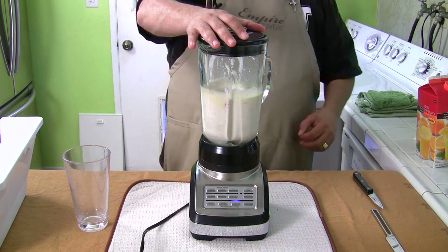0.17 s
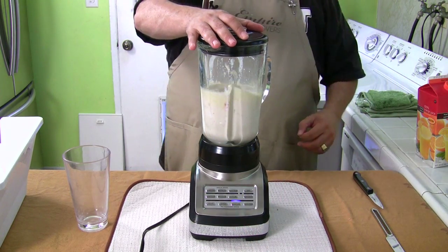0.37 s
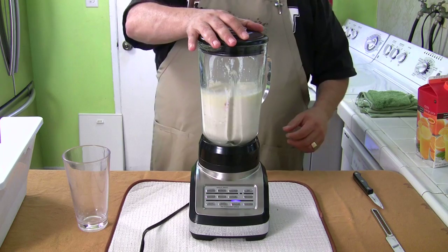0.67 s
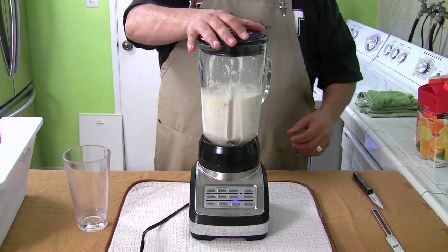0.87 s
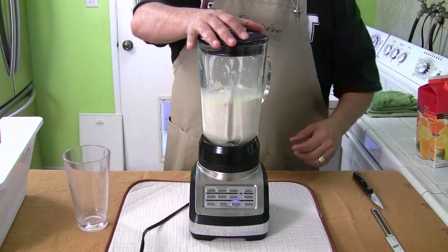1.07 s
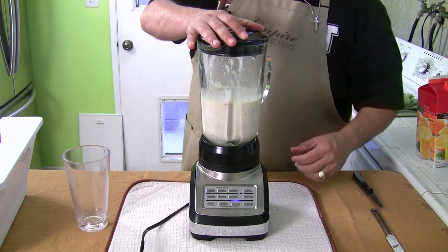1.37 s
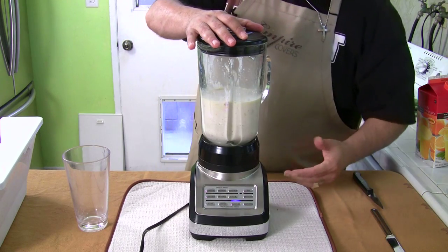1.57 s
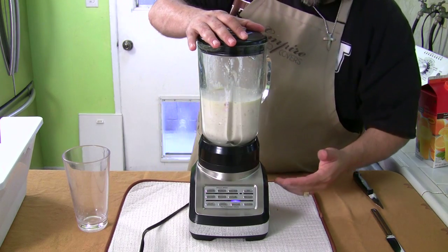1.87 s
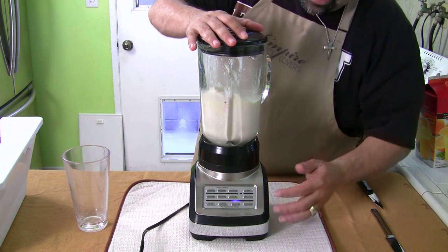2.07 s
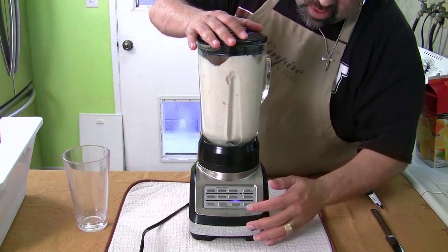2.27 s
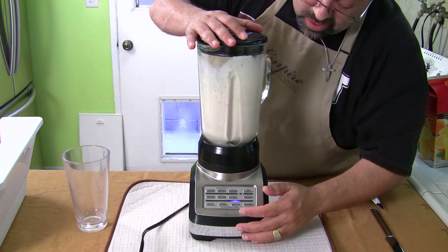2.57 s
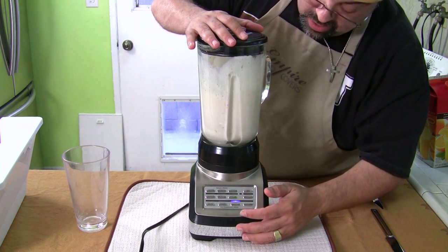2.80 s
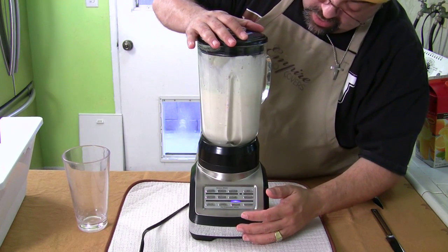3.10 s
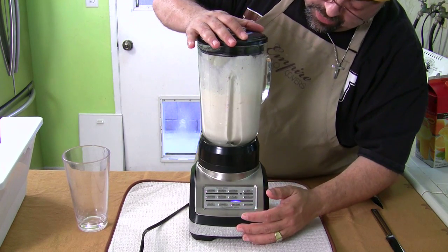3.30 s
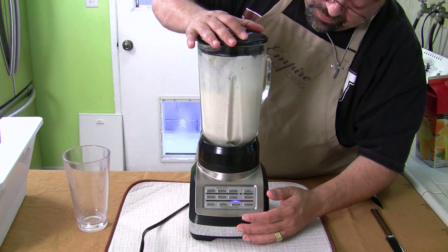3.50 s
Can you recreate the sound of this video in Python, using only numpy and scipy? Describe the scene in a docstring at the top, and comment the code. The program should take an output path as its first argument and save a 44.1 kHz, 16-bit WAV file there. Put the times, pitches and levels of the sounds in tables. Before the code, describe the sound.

A blender crushes ice in a thick drink, loud and rattling, then coasts down through sparser clacks to quiet. After a second it restarts with a tick and gulp, grinding hard again; close microphone, small kitchen.

```python
"""A blender crushes ice into a smoothie in a small kitchen, coasts almost to a stop and starts with a gulp.
Chips snap over a whirr that pulses with each turn; strikes and crunches are short bursts of noise.
Jar and wall ring as banks of resonances; churning and gulp are random clicks turned into liquid tones.
The shaft shakes the base, the windings hum, and a short room tail and quiet ambience lie behind."""
import sys
import numpy as np
from scipy import signal
from scipy.fft import rfft, irfft, next_fast_len
from scipy.io import wavfile

SR = 44100
rng = np.random.default_rng(int(sys.argv[2]) if len(sys.argv) > 2 else 0)


def materialize(psi):
    """Save the field psi as 16-bit PCM at rate SR to the path in sys.argv[1].

    A 1-D psi becomes a single channel; in a 2-D psi each row is a channel.
    """
    bounded = np.clip(np.atleast_2d(psi).T, -1, 1)
    quanta = np.round(bounded * 32767).astype(np.int16)
    wavfile.write(sys.argv[1], SR, quanta)


N = 160965
T = np.arange(N) / SR  # s

# Shaft speed before its small waver. Each row: time in seconds, speed in turns per second.
SHAFT_SPEED = [(0, 218), (.15, 256), (.23, 247), (.29, 215), (.35, 201), (.46, 133), (.51, 121), (.61, 102),
               (1.05, 2), (2.06, 2.01), (2.17, 118), (2.28, 212), (2.44, 240), (2.76, 221), (2.92, 246),
               (3.06, 233), (3.14, 215), (3.29, 249), (3.65, 255)]
SPEED_WAVER = 0.012  # fraction of the speed

# Grinding level. Each row: time in seconds, level in dB.
GRIND_LEVEL = [(0, -20.5), (.44, -23), (.5, -29), (.58, -26), (.68, -27.5), (.73, -33.5), (.81, -24),
               (.86, -40), (.93, -34.5), (1.0, -45), (1.15, -79), (2.058, -91.5), (2.066, -34.5),
               (2.15, -20), (2.24, -26.5), (2.3, -29.5), (2.36, -21), (2.65, -19.5), (3.06, -20),
               (3.14, -22.5), (3.3, -19.5), (3.65, -19.5)]
# Chip and whirr levels are relative to GRIND_LEVEL.
CHIPS_PER_S, CHIP_SPREAD_DB, CHIP_DECAY_S, CHIPS_DB = 890, 3, 0.0038, -3.5
WHIRR_DB, WHIRR_DEPTH = -9.5, 0.35
# Treble gain is TREBLE_DB times 0.5 at top speed, 1.5 at standstill.
DULL_ABOVE_HZ, TREBLE_DB = 8000, -4.5
# Grinding spectrum, liquid low in the jar. Each row: frequency in Hz, relative density in dB per Hz.
LOW_FILL_SPECTRUM = [(300, -13.5), (1050, -7.5), (1380, 0), (1950, -7.5), (4500, -4), (7200, -5),
                     (10500, -18), (12500, -17.5), (15000, -13.5)]
# Grinding spectrum, liquid thrown up the walls. Each row: frequency in Hz, relative density in dB per Hz.
HIGH_FILL_SPECTRUM = [(300, -10.5), (750, 0.5), (1060, -18.5), (1300, 2.5), (1950, 4), (2430, -3),
                      (3400, -2.5), (6200, -1), (8500, -7.5), (10200, -18), (12500, -17), (14300, -10.5),
                      (15800, -13)]

# A blade hits a lump of ice. Each row: start in seconds, level in dB relative to STRIKE_DB.
ICE_STRIKES = [(0.0014, 3.5), (0.2355, -1.5), (0.4075, -2.5), (0.534, -2), (0.6152, -1), (0.6708, -6),
               (0.6923, -1), (0.6984, -5), (0.7563, -2), (0.778, -1.5), (0.796, -16), (0.8057, -1),
               (0.8174, -11), (0.8786, -9), (0.8877, -4), (0.9084, -5), (0.9654, -20.5), (1.005, -29),
               (1.013, -25), (1.116, -42), (2.0716, -5), (2.1387, -2), (2.1607, 2), (2.179, 1.5),
               (2.199, -3), (2.3037, -5), (2.32, 1), (2.383, 0), (2.4461, 5), (2.59, -17), (2.6, 3.5),
               (2.7414, 4.5), (2.8025, -0.5), (2.867, -2), (2.9404, -1), (2.971, -3), (3.055, 0.5),
               (3.1126, 0), (3.2313, -1.5), (3.3155, -3.5), (3.418, -2.5), (3.4706, 1)]
STRIKE_DB, STRIKE_RISE_S, STRIKE_DECAY_S = -10.5, 0.0027, 0.0039
# A lump is caught and chewed up. Each row: middle in seconds, length in seconds, level in dB re CRUNCH_DB.
ICE_CRUNCHES = [(0.317, 0.0076, -13.5), (0.379, 0.031, -15.5), (0.408, 0.013, -9), (0.621, 0.013, -14),
                (2.331, 0.0076, -14.5), (2.125, 0.027, -17), (2.226, 0.02, -15.5), (2.375, 0.038, -16),
                (2.441, 0.015, -11.5), (2.558, 0.025, -14), (2.599, 0.021, -11.5), (2.753, 0.0089, -13.5),
                (3.018, 0.009, -10), (3.379, 0.022, -14)]
CRUNCH_DB, GRIT_DB, GRIT_RATE_HZ = -6.0, 4.5, 450
# Breaking-ice spectrum. Each row: frequency in Hz, relative density in dB per Hz.
CRACK_SPECTRUM = [(80, -19), (300, -3.5), (1300, 0), (2100, -4.5), (2900, 3), (6300, -0.5), (8000, -4.5),
                  (11000, -16.5), (15000, -13)]

# A whole cube clonks against the jar. Each row: start in seconds, level in dB.
CUBE_THUDS = [(.396, -0.5), (.778, -3), (.806, -8), (2.223, -5)]
# Clonk resonances. Each row: frequency in Hz, width in Hz, linear gain.
THUD_MODES = [(295, 30, 1.1), (1255, 90, 2)]
THUD_DECAY_S = 0.018

# Jar resonances, liquid low. Each row: frequency in Hz, width in Hz, linear gain.
JAR_LOW_MODES = [(1270, 86, 1.5), (2133, 130, 0.59), (2590, 130, 1.8), (2910, 34, 0.7), (3450, 130, 0.62),
                 (3906, 260, 1.3), (4930, 200, 0.62), (6060, 220, 1.284), (7480, 100, 0.48)]
# Jar resonances, liquid high. Each row: frequency in Hz, width in Hz, linear gain.
JAR_HIGH_MODES = [(1620, 130, 0.43), (2818, 194, 1.56), (3300, 130, 0.707), (4100, 165, 1),
                  (4790, 390, 0.65), (5610, 110, 0.82), (6100, 220, 0.78), (6790, 440, 1.05)]

# Wall modes. Each row: frequency in Hz, time to decay by 60 dB in seconds, relative level in dB.
WALL_MODES = [(1494, 0.07, -2.5), (1618.6, 0.057, 9), (1662.5, 0.13, 7.5)]
ICE_ON_WALL = 1.8  # gain from breaking ice to the wall
# Level of soft lumps knocking on the wall. Each row: time in seconds, level in dB.
KNOCK_LEVELS = [(0, -22), (.25, -24), (.5, -30.5), (.68, -26), (.85, -37.5), (1.02, -46.5), (1.12, -100),
                (2.06, -100), (2.1, -24.5), (2.28, -37.5), (2.5, -29.5), (3.65, -25.5)]
KNOCKS_PER_S, KNOCK_SPREAD_DB = 220, 0.5

# Churning level. Each row: time in seconds, level in dB.
CHURN_LEVEL = [(0, -37), (.5, -35), (.72, -39), (.8, -30.5), (.86, -38), (.92, -35.5), (1.05, -47),
               (1.18, -70.5), (2.058, -87.5), (2.068, -24), (2.18, -23.5), (2.3, -32), (3.05, -29.5),
               (3.65, -31.5)]
CHURN_CLICKS_PER_S, CHURN_SPREAD_DB = 1500, 3.5
# Churning spectrum. Each row: frequency in Hz, relative density in dB per Hz.
LIQUID_SPECTRUM = [(25, -18.5), (65, -12), (110, -4.5), (175, -10.5), (225, -0.5), (295, 3.5), (385, -5),
                   (470, 5.5), (580, -8), (1000, -8), (2000, -36.5)]
# The blades bite into the still liquid.
START_S, GULP_RISE_S, GULP_HOLD_S, GULP_FALL_S, GULP_DB = 2.061, 0.0026, 0.11, 0.017, -18
GULP_FROM_HZ, GULP_TO_HZ, GULP_SINK_S, GULP_WIDTH_OCT = 386, 140, 0.12, 0.57
GULP_CLICKS_PER_S, GULP_SPREAD_DB = 1000, 6.0  # clicks per second in each pitch band
HIGH_FILL_FROM_S = START_S - 0.1  # the jar and grinding spectra switch while nearly silent

# The coupling snaps tight at the restart. Each row: frequency in Hz, width in Hz, linear gain.
COUPLING_MODES = [(8750, 670, 0.19), (11450, 660, 1), (13300, 820, 0.64)]
COUPLING_S, COUPLING_DB, COUPLING_DECAY_S = 2.0715, -9, 0.0032

# Shaft imbalance. Each row: multiple of the shaft speed, rms level in dB at top speed.
SHAFT_MULTIPLES = [(1, -40.5), (2, -48.5)]
SHAFT_WAVER_DB = 2
# Resonances of the base on its feet. Each row: frequency in Hz, width in Hz, linear gain.
BASE_MODES = [(114, 12, 15), (290, 8.7, 2), (472, 16, 5.1)]
# Mains hum in the motor. Each row: time in seconds, rms level in dB.
HUM_LEVEL = [(0, -64), (.07, -46), (.14, -35.5), (.21, -53), (.76, -53), (.82, -31), (.88, -45),
             (1.08, -55), (1.2, -76.5), (2.05, -74.5), (2.08, -37), (2.2, -27.5), (2.3, -37), (2.7, -40.5),
             (2.88, -34), (3.65, -37)]
HUM_HZ, HUM_WAVER_DB, HUM_WAVER_RAD = 122.4, 3, 1.0

ROOM_T60_S, ROOM_DB, ROOM_DAMP_HZ, ROOM_DELAY_S = 0.21, -15.5, 7000, 0.004
# Quiet kitchen. Each row: frequency in Hz, relative density in dB per Hz.
AMBIENCE_SPECTRUM = [(28, 0), (58, -8), (85, -18), (172, -11.5), (198, -1.5), (230, -10.5), (1300, -26),
                     (15500, -31)]
AMBIENCE_DB = -63.5
CUTOFF_HZ, PEAK_LIMIT = 15900, 1.3


def from_db(db):
    """Decibels to gain."""
    return 10 ** (np.asarray(db) / 20)


def unit(x):
    """Scale to rms 1."""
    return x / np.sqrt(np.mean(x ** 2) + 1e-20)


def curve(rows):
    """Join (s, value) rows by straight lines."""
    return np.interp(T, *np.transpose(rows))


def noise():
    """White noise."""
    return rng.standard_normal(N)


def drift(rate_hz):
    """Slow random wander of rms 1, with rate_hz new values per second."""
    return unit(np.interp(T * rate_hz, np.arange(2000), rng.standard_normal(2000)))


def decay(age_s, decay_s):
    """Exponential fall that starts at age 0, silent before."""
    return (age_s > 0) * np.exp(-np.clip(age_s / decay_s, 0, 20))


def clicks(per_s, spread_db):
    """Random impacts of uneven size and sign."""
    sizes = from_db(spread_db * np.minimum(rng.exponential(1, N), 4))
    return (rng.random(N) < per_s / SR) * sizes * rng.choice([-1, 1], N)


def colour(x, points):
    """Causal minimum-phase filter with the given spectrum; white noise keeps its level."""
    size = next_fast_len(N + SR // 4) * 2
    hz, db = np.transpose(points)
    bins_hz = np.arange(size // 2 + 1) * SR / size
    gain = unit(from_db(np.interp(np.log(bins_hz + 1), np.log(hz), db)))
    # folding the cepstrum gives minimum phase
    cepstrum = irfft(np.log(gain))
    cepstrum[1:size // 2] *= 2
    cepstrum[size // 2 + 1:] = 0
    return irfft(rfft(x, size) * np.exp(rfft(cepstrum)))[:N]


def resonate(x, hz, width_hz):
    """Two-pole resonance with gain 1 on top."""
    r = np.exp(-np.pi * width_hz / SR)
    zeros = np.array([1, 0, -1]) * (1 - r * r) / 2
    poles = [1, -2 * r * np.cos(2 * np.pi * hz / SR), r * r]
    return signal.lfilter(zeros, poles, x + 1e-18)


def ring(x, modes):
    """Sum of (Hz, width Hz, gain) resonances driven by x."""
    return sum(gain * resonate(x, hz, width_hz) for hz, width_hz, gain in modes)


def grinding(speed, turns):
    """Chips snap in quick succession over a whirr that pulses each turn; colour follows fill and speed."""
    impacts = clicks(CHIPS_PER_S, CHIP_SPREAD_DB) ** 2
    snap_power = signal.lfilter([1], [1, -np.exp(-2 / (CHIP_DECAY_S * SR))], impacts + 1e-18)
    chips = from_db(CHIPS_DB) * unit(np.sqrt(snap_power) * noise())
    pulse = 1 + WHIRR_DEPTH * np.cos(2 * np.pi * turns)
    whirr = from_db(WHIRR_DB) * unit(noise() * pulse)
    drive = (chips + whirr) * from_db(curve(GRIND_LEVEL))

    # slow blades make fewer fine chips: less treble
    lowpass = signal.butter(2, DULL_ABOVE_HZ, fs=SR, output="sos")
    dull = signal.sosfiltfilt(lowpass, drive)
    drive = dull + (drive - dull) * from_db(TREBLE_DB * (1.5 - speed / speed.max()))

    high = T > HIGH_FILL_FROM_S
    return colour(drive * ~high, LOW_FILL_SPECTRUM) + colour(drive * high, HIGH_FILL_SPECTRUM)


def breaking_ice():
    """Single sharp cracks and longer, gritty crunches: noise under summed power envelopes."""
    power = np.zeros(N)
    for start_s, db in ICE_STRIKES:
        age_s = T - start_s
        rise = np.clip(age_s / STRIKE_RISE_S, 0, 1)
        power += (from_db(db + STRIKE_DB) * rise * decay(age_s, STRIKE_DECAY_S)) ** 2
    grit = unit(from_db(GRIT_DB * drift(GRIT_RATE_HZ)))
    for middle_s, length_s, db in ICE_CRUNCHES:
        bell = np.exp(-np.minimum(2 * ((T - middle_s) / length_s) ** 2, 20))
        power += (from_db(db + CRUNCH_DB) * grit * bell) ** 2
    return colour(np.sqrt(power) * noise(), CRACK_SPECTRUM)


def jar(x):
    """Adds jar resonances to the sound inside; they shift when the smoothie is thrown up the walls."""
    high = T > HIGH_FILL_FROM_S
    return x + ring(x * ~high, JAR_LOW_MODES) + ring(x * high, JAR_HIGH_MODES)


def wall(x):
    """The wall's cluster of close modes; each width follows from its decay time."""
    return sum(from_db(db) * resonate(x, hz, np.log(1000) / np.pi / t60_s)
               for hz, t60_s, db in WALL_MODES)


def wall_knocks():
    """Lumps tumble against the wall and keep it ringing."""
    knocks = clicks(KNOCKS_PER_S, KNOCK_SPREAD_DB)
    return unit(wall(knocks)) * from_db(curve(KNOCK_LEVELS))


def thuds():
    """Whole cubes are flung against the jar and rattle there briefly with a hollow clonk."""
    force = sum(from_db(db) * decay(T - start_s, THUD_DECAY_S) for start_s, db in CUBE_THUDS)
    return ring(force * noise(), THUD_MODES)


def churning():
    """Dense random clicks in the liquid, filtered to its spectrum."""
    bubbles = unit(clicks(CHURN_CLICKS_PER_S, CHURN_SPREAD_DB))
    return colour(bubbles, LIQUID_SPECTRUM) * from_db(curve(CHURN_LEVEL))


def gulp():
    """A burst of collapsing air pockets at the restart that sink in pitch as they grow."""
    age_s = np.maximum(T - START_S, 0)
    rise = np.minimum(age_s / GULP_RISE_S, 1)
    swell = rise * np.exp(-np.maximum(age_s - GULP_HOLD_S, 0) / GULP_FALL_S)
    centre_hz = GULP_TO_HZ + (GULP_FROM_HZ - GULP_TO_HZ) * np.exp(-(age_s / GULP_SINK_S) ** 2)
    pockets = np.zeros(N)
    for hz in np.geomspace(80, 800, 12):
        nearness = np.exp(-.5 * (np.log2(hz / centre_hz) / GULP_WIDTH_OCT) ** 2)
        hits = clicks(GULP_CLICKS_PER_S, GULP_SPREAD_DB) * swell * nearness
        pockets += resonate(hits, hz, hz / 4) / np.sqrt(hz)
    return from_db(GULP_DB) * unit(pockets) * np.sqrt(np.mean(swell ** 2))


def coupling():
    """One bright metallic tick as the drive takes up its play."""
    snap = from_db(COUPLING_DB) * noise() * decay(T - COUPLING_S, COUPLING_DECAY_S)
    return ring(snap, COUPLING_MODES)


def motor(speed, turns):
    """Imbalance shakes the base with speed squared, flaring at its resonances; the windings hum."""
    shake = np.zeros(N)
    for multiple, db in SHAFT_MULTIPLES:
        level = from_db(db + SHAFT_WAVER_DB * drift(15))
        shake += level * np.sin(2 * np.pi * multiple * turns)
    shake *= (speed / speed.max()) ** 2
    hum_level = from_db(curve(HUM_LEVEL) + HUM_WAVER_DB * drift(15))
    hum = hum_level * np.sin(2 * np.pi * HUM_HZ * T + HUM_WAVER_RAD * drift(13))
    return np.sqrt(2) * (shake + ring(shake, BASE_MODES) + hum)  # root 2: rms to peak


def kitchen(x):
    """A short diffuse tail: decaying noise, slightly dulled."""
    t = T[:SR // 2]
    tail = rng.standard_normal(len(t)) * from_db(-60 * t / ROOM_T60_S) * (t > ROOM_DELAY_S)
    tail = signal.lfilter([1], [1, -np.exp(-2 * np.pi * ROOM_DAMP_HZ / SR)], tail)
    tail /= np.sqrt(np.sum(tail ** 2))
    return from_db(ROOM_DB) * signal.fftconvolve(x, tail)[:N]


def ambience():
    """The kitchen's quiet: steady coloured noise."""
    return from_db(AMBIENCE_DB) * colour(noise(), AMBIENCE_SPECTRUM)


def scene():
    """The blender on the counter, in the kitchen's quiet."""
    speed = curve(SHAFT_SPEED) * (1 + SPEED_WAVER * drift(35))
    turns = np.cumsum(speed) / SR  # shaft angle
    ice = breaking_ice()
    blender = jar(grinding(speed, turns) + ice) + ICE_ON_WALL * wall(ice)
    blender += wall_knocks() + thuds() + churning() + gulp() + coupling()
    return (blender + kitchen(blender) + motor(speed, turns) + ambience())[None]


def record(dry):
    """The highest peaks are rounded and the top is cut."""
    rounded = PEAK_LIMIT * np.tanh(dry / PEAK_LIMIT)
    lowpass = signal.ellip(12, .1, 80, CUTOFF_HZ, fs=SR, output="sos")
    return signal.sosfilt(lowpass, rounded)


dry = scene()
out = record(dry)
materialize(out)
```